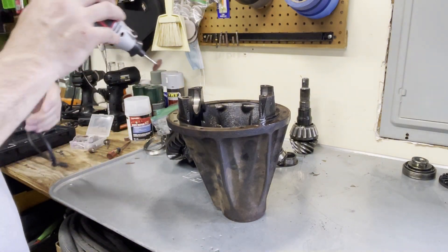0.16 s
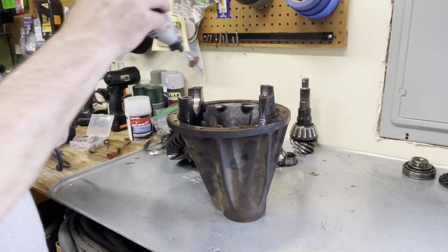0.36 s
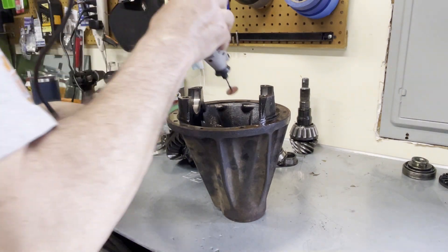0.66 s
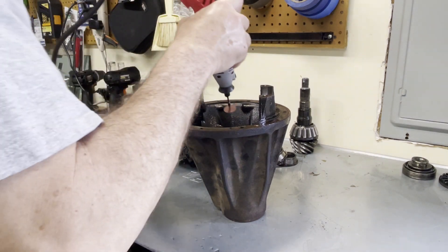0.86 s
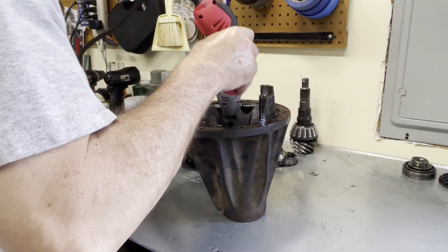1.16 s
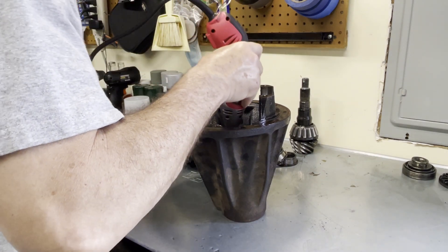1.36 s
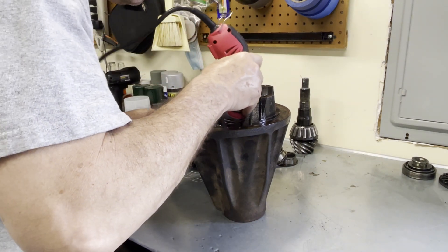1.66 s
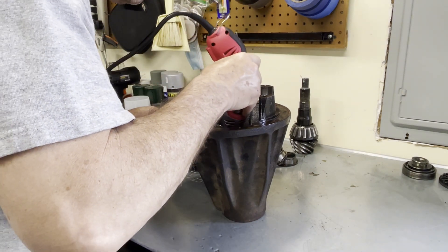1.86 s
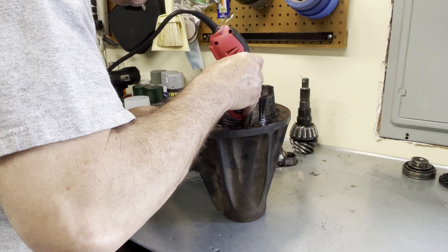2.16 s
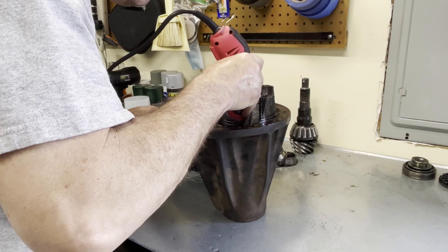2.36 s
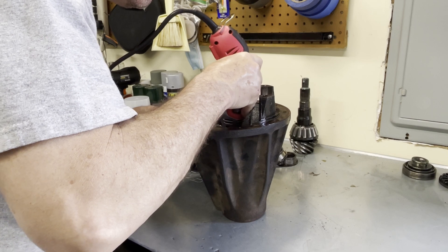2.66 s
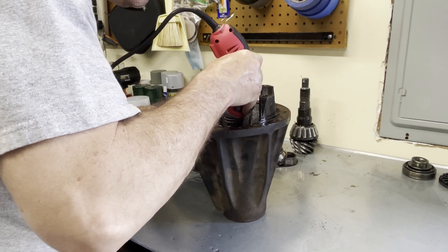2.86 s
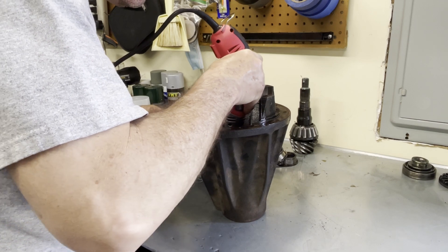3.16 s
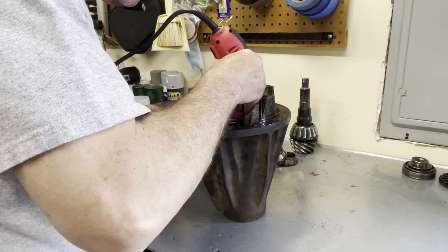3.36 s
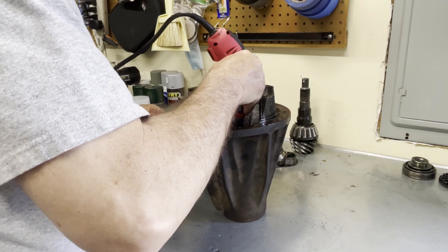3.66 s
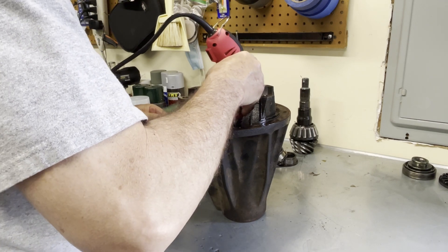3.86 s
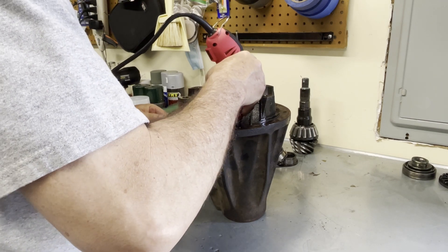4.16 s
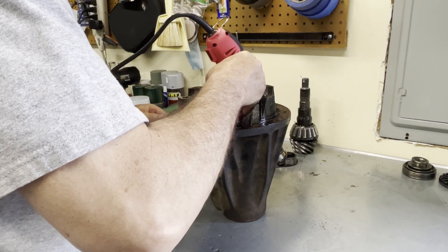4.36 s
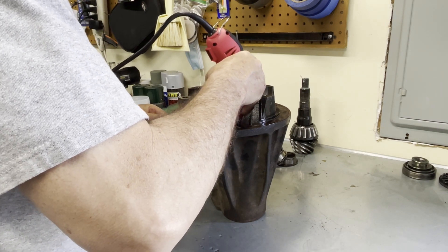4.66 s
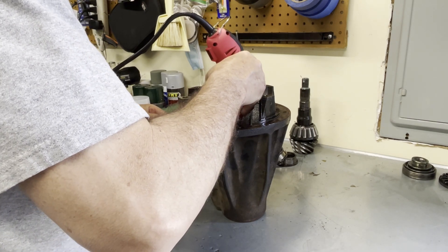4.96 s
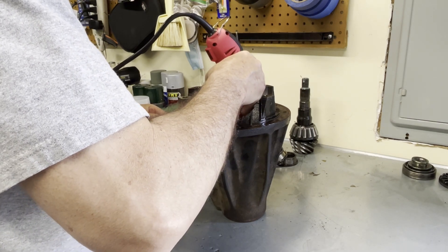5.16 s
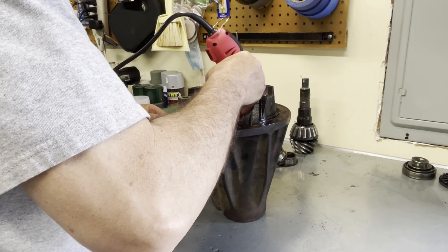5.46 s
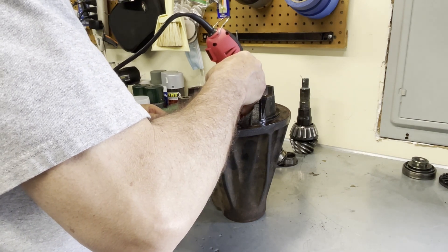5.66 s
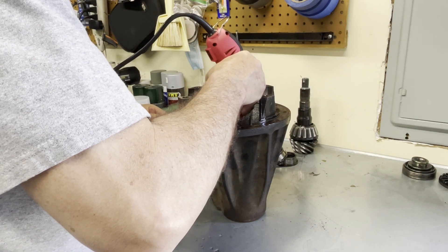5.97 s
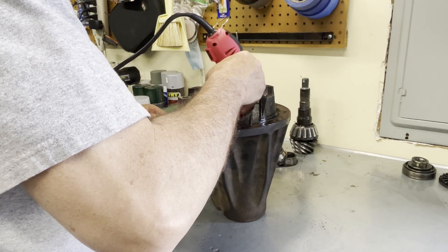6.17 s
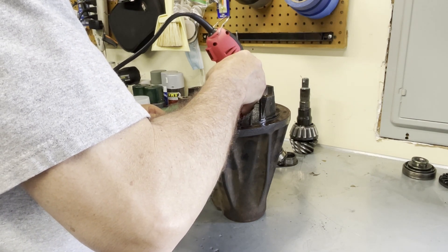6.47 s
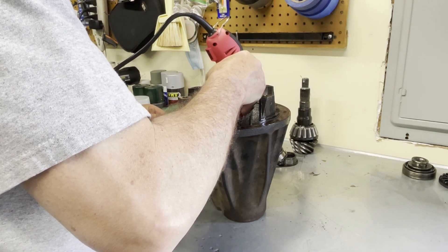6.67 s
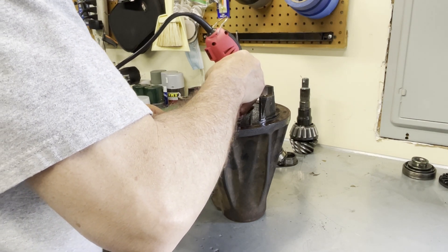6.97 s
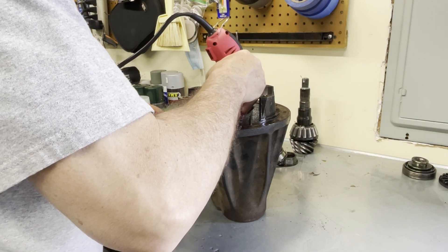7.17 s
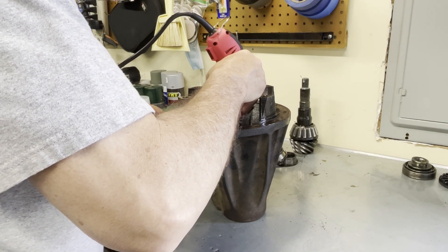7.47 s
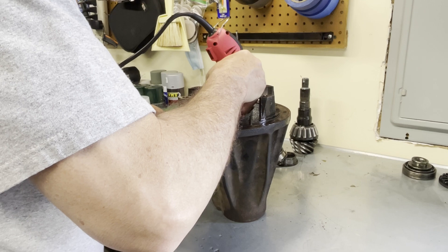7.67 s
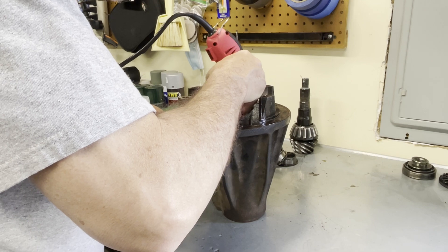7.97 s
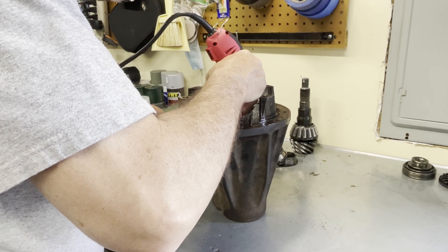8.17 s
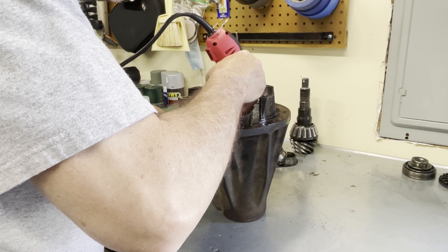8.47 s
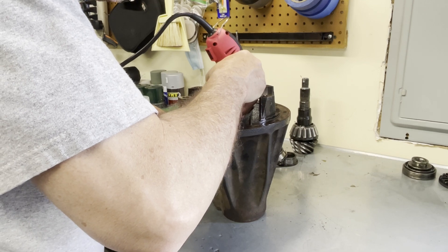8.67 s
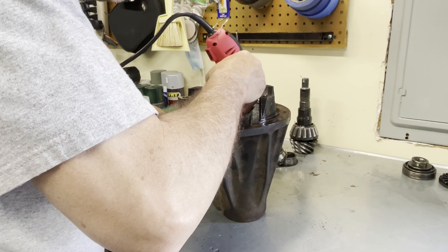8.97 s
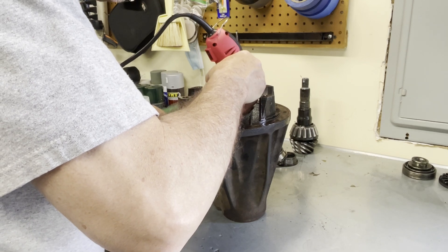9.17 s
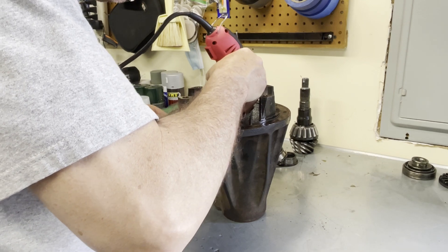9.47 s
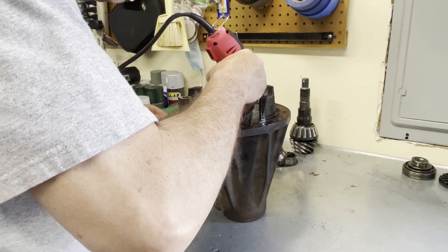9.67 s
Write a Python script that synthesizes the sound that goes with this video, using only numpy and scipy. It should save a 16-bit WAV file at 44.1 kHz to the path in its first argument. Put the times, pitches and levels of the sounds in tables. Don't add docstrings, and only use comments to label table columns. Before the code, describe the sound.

In a garage with faint low rumble, a small mains-fed rotary tool runs close to a stereo pair of microphones. From 0 s its hum and buzzing whine climb, fast in the first second, then gradually, while the fan rush thickens and a rough, breathy whistle passes at about 0.7 to 1.8 s. By 3 s it is nearly steady: a shaft hum, an electrically rough high whine and bright hiss. At 3.8 s a sharp rasp bites iron, leaving an added wobbling tone in the motor. Two strong dabs come around 4.8 to 4.9 s, then light brushes until 6.1 s, a hard cluster at 6.2 to 6.4 s, softer scrapes around 6.9 to 7.1 s and 7.6 to 8 s. From 8.4 to 9.3 s dense, gritty grinding peaks near 9 s, dragging the pitch down. The motor then recovers and keeps whirring to the end.

```python
import sys
import numpy as np
from scipy import signal
from scipy.fft import rfft, irfft, next_fast_len
from scipy.io import wavfile
from scipy.ndimage import uniform_filter1d

SR = 44100
rng = np.random.default_rng(int(sys.argv[2]) if len(sys.argv) > 2 else 0)


def to_wav(s):
    ch = np.atleast_2d(s).T
    pcm = np.round(np.clip(ch, -1, 1) * 32767)
    wavfile.write(sys.argv[1], SR, pcm.astype(np.int16))


def decibels_to_gain(level_db):
    exponent = np.asarray(level_db, float) / 20
    return 10 ** exponent


N = 433062

FULL_SPEED = 470
MAINS_PULSE_HZ = 120
FIRST_TOUCH = round(3.6 * SR)
KNOCKED_S = 3.86


def unit(x):
    return x / np.sqrt(np.mean(np.abs(x) ** 2) + 1e-20)


def in_time(rows):
    s, *columns = np.transpose(rows)
    return [np.interp(np.arange(N) / SR, s, c) for c in columns]


def drift(rate, size=N):
    r = np.exp(-64 * np.pi * rate / SR)
    slow = signal.lfilter([1], [1, -2 * r, r * r], rng.standard_normal(size // 32 + 3002))
    slow = slow[3000:]
    return np.interp(np.arange(size) / 32, np.arange(len(slow)), unit(slow - slow.mean()))


def coloured(spectrum, size=N):
    hz = np.fft.rfftfreq(size, 1 / SR) + 1e-3
    at, level_db = np.transpose(spectrum)
    gain = decibels_to_gain(np.interp(np.log(hz), np.log(at), level_db, left=-90, right=-90))
    return unit(irfft(rfft(rng.standard_normal(size)) * gain, size))


def resonance(x, hz, width_hz):
    r = np.exp(-np.pi * width_hz / SR)
    poles = [1, -2 * r * np.cos(2 * np.pi * hz / SR), r * r]
    return signal.lfilter([(1 - r * r) / 2, 0, (r * r - 1) / 2], poles, x)


# f/Hz, level/dB per Hz
RUMBLE = [(15, -58), (25, -22), (54, 2.5), (178, -4.5), (241, -9), (290, -5), (330, -6.5), (430, -11.5),
          (730, -120)]


def garage():
    mid = coloured(RUMBLE)
    side = decibels_to_gain(-11.5) * coloured(RUMBLE)
    return decibels_to_gain(-54) * (mid + side * [[1], [-1]]) * decibels_to_gain([[-1.1], [1.1]])


# t/s, speed/turns per s
SPEED = [(0, 369), (.3, 398), (.75, 419), (1.5, 444.6), (2.2, 456.8), (3.8, 468.2), (4.0, 465.5),
         (4.76, 469.8), (4.95, 467), (6.01, 474.8), (6.4, 464.6), (6.8, 471.8), (7.04, 467.6),
         (7.74, 477.6), (7.94, 472), (8.42, 480.3), (9.2, 464), (9.82, 479)]


def shaft_speed():
    return uniform_filter1d(in_time(SPEED)[0], size=SR // 10, mode="nearest")


# speed/turns per s, x1 level/dB, x2 level/dB
UNBALANCE = [(360, -44, -46), (405, -37.5, -48), (414, -31.5, -53), (432, -35.5, -53), (446.6, -34.5, -49),
             (453.2, -39, -42.5), (460.8, -32.5, -38), (458, -34, -44), (470.5, -33, -44),
             (476, -36.5, -43)]
# multiple of shaft speed, level before knock/dB, level after/dB, settling/dB per s
WOBBLE = [(5, -57, -38, .7), (6, -57, -50, .1), (7, -60, -32, 1.5)]


def tone_levels():
    t = np.arange(N) / SR
    speed = shaft_speed()
    at, *columns = np.transpose(UNBALANCE)
    once, twice = (np.interp(speed, at, c) for c in columns)
    since = t - KNOCKED_S
    knocked = np.clip(since / 0.067, 0, 1)
    wobble = []
    for _, before_db, after_db, settles in WOBBLE:
        change_db = after_db - settles * since - before_db
        wobble.append(before_db + knocked * change_db + 1.4 * drift(2))
    whine = np.interp(speed, [461, 466], [-37.5, -32.5])
    whine = whine + 10 * np.exp(-t / 0.22)
    whine = whine - 1.16 * np.maximum(since, 0) + drift(0.5)
    return once + 0.28 * drift(4.5), twice + 2.1 * drift(5.1), *wobble, whine


# multiple of shaft speed, level/dB rms
OTHER_ORDERS = [(4, -63), (9, -50), (10, -45.5), (11, -47.5), (12, -69), (13, -53), (14, -48.5), (15, -59),
                (16, -47), (17, -58), (18, -71), (19, -88), (20, -87), (21, -86), (22, -72), (23, -75),
                (24, -71), (25, -57), (26, -67), (31, -53), (33, -57)]


def shaft_tones(angle, mains, levels_db, short_of_speed):
    once, twice, five, six, seven = levels_db
    tones = [(1, once), (2, twice), (3, -43 - 0.15 * short_of_speed)]
    tones += [(5, five + 1.1 * drift(6.4)), (6, six), (7, seven + 0.37 * drift(4.2))]
    tones += [(k, db + 1.65 * drift(5.1)) for k, db in OTHER_ORDERS]
    shaft = np.zeros(N, complex)
    for k, db in tones:
        shaft += decibels_to_gain(db) * np.exp(1j * (round(k) * angle + 2 * np.pi * rng.random()))
    nudge = decibels_to_gain(-17) * mains + decibels_to_gain(-30) * mains.conj() + decibels_to_gain(-23) * mains * mains
    return shaft * (1 + nudge * decibels_to_gain(-0.2 * short_of_speed))


# side line number (steps of the pulse rate), level/dB
CHOPPED = [(-4, -17), (-3, -13), (-2, -8.5), (-1, -6.5), (0, -5.5), (1, -7), (2, -11), (3, -15), (4, -16)]
# multiple of shaft speed, level/dB re whine
OVERTONES = [(16, -12), (24, -24), (28, -36), (32, -37)]


def commutator_whine(angle, mains, whine_db, short_of_speed):
    bar_hz = 8 * (FULL_SPEED - short_of_speed)
    beat = np.angle(mains)
    smear = 0.35
    pulses = np.zeros(N, complex)
    for n, db in CHOPPED:
        line_hz = bar_hz + n * MAINS_PULSE_HZ
        lift_db = 10 * np.exp(-((line_hz - 2730) / 58) ** 2)
        shut_db = -12 * np.clip((2660 - line_hz) / 100, 0, 1)
        level_db = db + lift_db + shut_db + 2.4 * drift(2.5)
        pulses += decibels_to_gain(level_db) * np.exp(1j * n * (smear * n + beat))
    overtones = sum(decibels_to_gain(db) * np.exp(1j * round(k) * angle) for k, db in OVERTONES)
    bars = np.exp(8j * angle) + decibels_to_gain(-0.07 * short_of_speed) * overtones
    return decibels_to_gain(whine_db) * pulses * bars


def motor(angle, mains):
    *shaft_db, whine_db = tone_levels()
    short_of_speed = FULL_SPEED - shaft_speed()
    shaft = shaft_tones(angle, mains, shaft_db, short_of_speed)
    whine = commutator_whine(angle, mains, whine_db, short_of_speed)
    return np.sqrt(2) * (shaft + whine).real


def air_levels():
    t = np.arange(N) / SR
    rasp_power = pressure(np.transpose(TOUCHES)[1]) ** 2
    load = uniform_filter1d(np.r_[np.zeros(FIRST_TOUCH), rasp_power], size=round(0.077 * SR))
    fade_db = -0.21 * np.maximum(t - KNOCKED_S, 0)
    rush_db = -37.5 - 4 * np.clip(1 - t, 0, 1) + fade_db
    hiss_db = -43.5 + fade_db

    def loaded(db, load_db):
        return 10 * np.log10(decibels_to_gain(2 * db) + decibels_to_gain(2 * load_db) * np.abs(load))

    return loaded(rush_db, -17), loaded(hiss_db, -17.5)


# f/Hz at full speed, level/dB per Hz
RUSH = [(300, -24.5), (500, -11), (690, -14), (800, -10), (1150, -3.5), (1300, -9), (1480, -0.5),
        (1650, -5), (1900, -4.5), (2400, -8.5), (3000, -6), (4500, -72)]
# f/Hz, level/dB per Hz
HISS = [(2200, -5), (3000, 8), (4200, 7), (5500, 7.5), (7200, 3.5), (9000, 2.5), (11600, -2.5), (13800, -7),
        (15000, -2.5), (16200, -15)]


def air(angle, mains):
    rush_db, hiss_db = air_levels()
    place = angle / (2 * np.pi * FULL_SPEED) * SR
    rush = np.interp(place, np.arange(N + SR), coloured(RUSH, size=N + SR))
    rush_throb = 1 + 0.03 * mains.real + 0.23 * (mains ** 2).real
    hiss_throb = 1 + 0.033 * mains.real + 0.029 * (mains ** 2).real
    rush = decibels_to_gain(rush_db + 4.0 + 0.7 * drift(19)) * rush * rush_throb
    hiss = decibels_to_gain(hiss_db + 10.0 + 0.56 * drift(23)) * coloured(HISS) * hiss_throb
    return rush + hiss


def vent():
    whistle_hz, width_hz = 1487, 100
    whistle_speed, speed_width = 433, 13.6
    blow = np.exp(-0.5 * ((shaft_speed() - whistle_speed) / speed_width) ** 2)
    blow = blow * decibels_to_gain(-38 + 2.2 * drift(23))
    noise = resonance(rng.standard_normal(N), whistle_hz, width_hz)
    return blow * unit(resonance(noise, whistle_hz, width_hz))


# t/s, rasp level/dB, rise/ms, fall/ms
TOUCHES = [(3.83, -13.5, 11, 46), (4.82, -16, 16, 44), (4.912, -18.5, 25, 50), (5.088, -29, 43, 14),
           (5.166, -28, 37, 49), (5.508, -26, 13, 53), (5.916, -30, 40, 64), (6.053, -25.5, 45, 85),
           (6.174, -16, 42, 56), (6.27, -15, 30, 29), (6.308, -13, 3.7, 42), (6.386, -25, 54, 31),
           (6.861, -20.5, 89, 24), (6.902, -17.5, 46, 47), (7.019, -25.5, 70, 81), (7.13, -20.5, 31, 34),
           (7.611, -26, 30, 46), (7.734, -21.5, 27, 53), (7.868, -17, 42, 76), (7.98, -24, 29, 48),
           (8.364, -33, 19, 32), (8.479, -21.5, 48, 110), (8.579, -21, 17, 56), (8.743, -16, 48, 44),
           (8.851, -13.5, 42, 29), (8.902, -22, 17, 41), (8.96, -11.5, 18, 41), (9.088, -18.5, 45, 47),
           (9.212, -18.5, 39, 41), (9.341, -25, 13, 24)]


def pressure(column_db):
    t, power = np.arange(N) / SR, np.zeros(N)
    for (s, _, rise_ms, fall_ms), db in zip(TOUCHES, column_db):
        near = slice(round((s - 0.2) * SR), round((s + 0.2) * SR))
        width = np.where(t[near] < s, max(rise_ms, 3), max(fall_ms, 3)) / 1000
        power[near] += decibels_to_gain(2 * db) * np.exp(-2 * ((t[near] - s) / width) ** 2)
    return np.sqrt(power[FIRST_TOUCH:])


# multiple of shaft speed, level/dB
WHEEL = [(3, -7), (4, -2), (5, 2.5), (6, 2), (7, -2), (8, -10), (9, 2), (10, -14), (11, -5), (12, -22),
         (13, 3), (14, -11), (15, -28), (16, -24), (17, -1), (18, -31), (19, -10), (20, -1.5), (21, -6),
         (22, 0.5), (23, -7), (24, -11.5), (25, -3.5), (26, -11), (27, -3), (28, -1.5), (29, -7), (30, -5),
         (31, -1), (32, -38), (33, -46)]


def worn_wheel(angle, wander_hz, steady):
    size = len(angle)
    growl, ring, rasp = np.zeros((3, size))
    for k, db in WHEEL:
        worn = steady / k + drift(wander_hz * k, size) + 1j * drift(wander_hz * k, size)
        turning = np.exp(1j * (round(k) * angle + 2 * np.pi * rng.random()))
        line = decibels_to_gain(db) * (worn * turning).real / np.hypot(steady / k, 1.4)
        if k < 11.5:
            growl += line
        elif k < 14.5:
            ring += line
        else:
            rasp += line
    return growl, ring, rasp


# f/Hz, width/Hz, level/dB
CASTING = [(5200, 98, -26), (8500, 150, -27), (9470, 94, -14.5), (9600, 87, 4.5), (12300, 390, -10),
           (13100, 270, -25), (14700, 350, -11), (16600, 520, 23)]


def loose_grit(angle):
    size = len(angle)
    high_spot = 1 + 0.29 * np.cos(angle)
    grit = rng.standard_normal(size) * high_spot * decibels_to_gain(4.4 * drift(100, size))
    body = decibels_to_gain(-14) * grit
    for n, (hz, width_hz, db) in enumerate(CASTING):
        body = body + decibels_to_gain(db) * resonance(grit, hz, width_hz) * (-1) ** n
    bright = signal.sosfilt(signal.butter(4, 6800, "high", fs=SR, output="sos"), body)
    dull = signal.sosfilt(signal.butter(2, [1600, 5500], "band", fs=SR, output="sos"), body)
    return unit(dull), unit(resonance(grit, 6070, 19)), unit(bright)


# t/s, ring level/dB re rasp, extra growl/dB
SPOT = [(3.8, -5, 0), (4.9, -9, 1), (5.5, 2, 0), (5.9, -7, 1.5), (6.31, -6, 2), (6.9, -13, 1),
        (8.48, -13, -0.5), (8.6, -3, -1), (9.35, -7.5, -1.5)]


def grinding(angle, wander_hz, steady, grit_db):
    angle = angle[FIRST_TOUCH:]
    growl, ring, rasp = worn_wheel(angle, wander_hz, steady)
    dull, grit_ring, bright = loose_grit(angle)
    s, rasp_db, *_ = np.transpose(TOUCHES)
    at, *columns = np.transpose(SPOT)
    ring_db, extra_db = (np.interp(s, at, c) for c in columns)
    growl_db = -22.5 + 0.64 * (rasp_db + 19) + extra_db
    out = pressure(rasp_db) * (unit(rasp) + decibels_to_gain(grit_db) * bright)
    out += pressure(rasp_db + ring_db) * (unit(ring) + decibels_to_gain(grit_db) * grit_ring)
    out += pressure(growl_db) * (unit(growl) + decibels_to_gain(grit_db - 5) * dull)
    return np.r_[np.zeros(FIRST_TOUCH), decibels_to_gain(0.9 * drift(30, len(angle))) * out]


# f/Hz, likeness 0-1, right leads/rad, left minus right/dB
PORTS = [(470, .97, -.6, 2.2), (750, .3, -.7, 1), (1400, .62, -.5, -1), (2500, .55, -.9, 1.5),
         (3800, .3, -1.6, 1), (4800, .35, -2.3, .5), (6100, .55, -.1, 0), (7100, .45, 1.7, -.5),
         (8200, .94, 3.14, -.5), (10000, .8, 5.1, -.5), (11600, .98, 6.28, 0), (13500, .77, 8, 0),
         (14900, .97, 9.42, 0), (15200, .97, 9.5, 0), (16000, .9, 9.9, 0)]


def microphones(x, t60, scatter):
    size = next_fast_len(N + SR // 2)
    hz = np.fft.rfftfreq(size, 1 / SR)
    at, alike, lead, pan_db = np.transpose(PORTS)
    alike = np.clip(np.interp(hz, at, alike), 0.01, 1) ** scatter
    half = np.exp(0.5j * np.interp(hz, at, lead)) * decibels_to_gain(-0.5 * np.interp(hz, at, pan_db))
    t = np.arange(SR // 2) / SR
    echoes = rng.standard_normal((2, len(t))) * decibels_to_gain(-60 * t / t60) * (t > 0.002)
    echoes = rfft(echoes / np.sqrt(np.sum(echoes ** 2, axis=1, keepdims=True)), size)
    paths = np.sqrt(alike) + np.sqrt(1 - alike) * echoes
    paths = paths / np.abs(paths) ** 0.9 * [1 / half, half]
    return irfft(rfft(x, size) * paths, size)[:, :N]


def scene():
    angle = 2 * np.pi * np.cumsum(shaft_speed()) / SR
    mains = np.exp(2j * np.pi * MAINS_PULSE_HZ * np.arange(N) / SR)
    wheel = grinding(angle, wander_hz=2.2, steady=20, grit_db=-4)
    pointed = microphones(motor(angle, mains) + decibels_to_gain(-2.5) * wheel, t60=0.1, scatter=0.13)
    spread = microphones(air(angle, mains) + vent(), t60=0.27, scatter=1.25)
    return pointed + spread + garage()


def roll_off(x):
    return signal.sosfilt(signal.butter(12, 15750, fs=SR, output="sos"), x)


def record(dry):
    level_db = 10 * np.log10(uniform_filter1d(np.mean(dry ** 2, axis=0), size=900) + 1e-12)
    ramp = 35 * np.arange(N) / SR
    held_db = np.maximum.accumulate(level_db + ramp) - ramp
    target_db = -0.35 * np.maximum(held_db + 25, 0)
    duck_db = signal.lfilter([0.002], [1, -0.998], target_db)
    return roll_off(dry * decibels_to_gain(duck_db))


dry = scene()
out = record(dry)
to_wav(out)
```